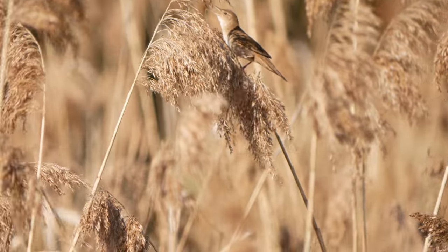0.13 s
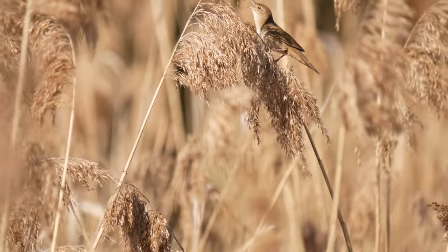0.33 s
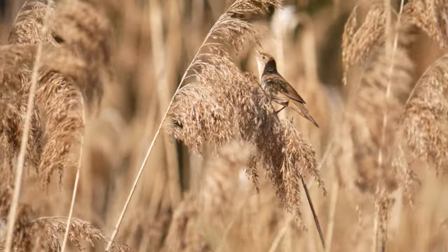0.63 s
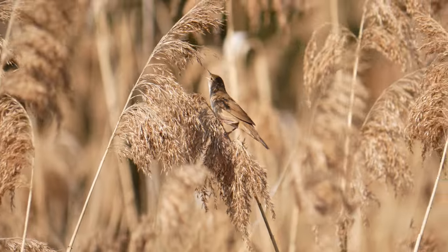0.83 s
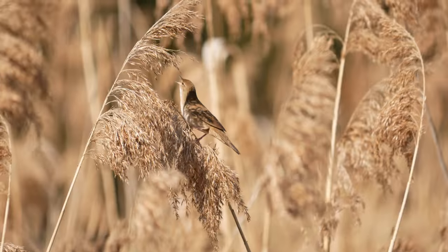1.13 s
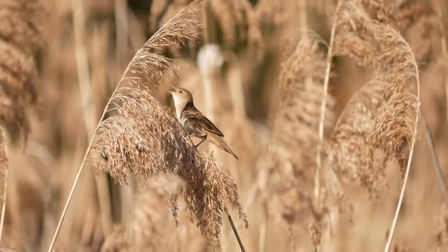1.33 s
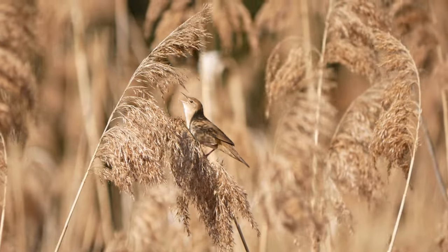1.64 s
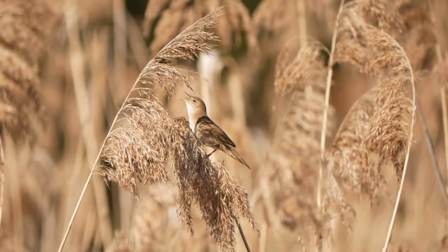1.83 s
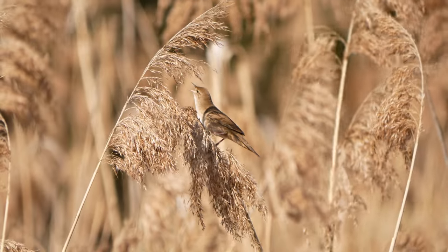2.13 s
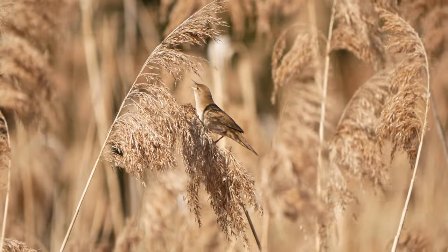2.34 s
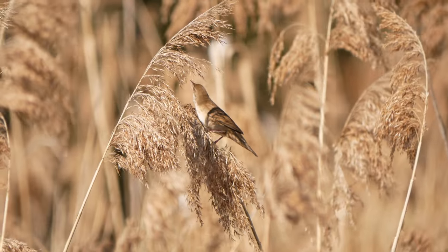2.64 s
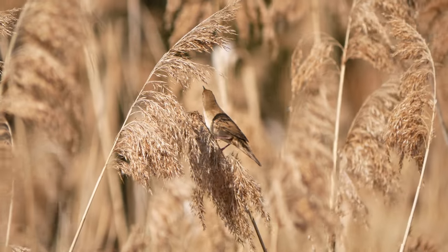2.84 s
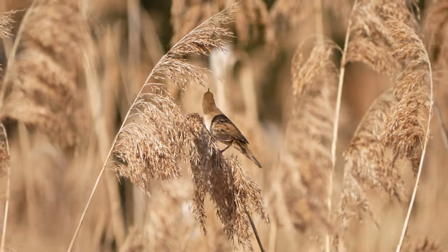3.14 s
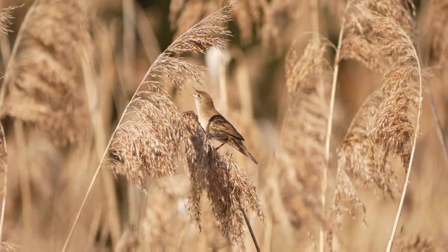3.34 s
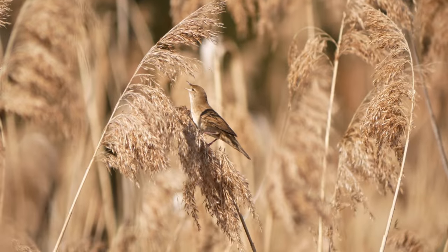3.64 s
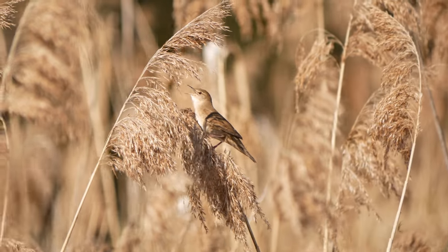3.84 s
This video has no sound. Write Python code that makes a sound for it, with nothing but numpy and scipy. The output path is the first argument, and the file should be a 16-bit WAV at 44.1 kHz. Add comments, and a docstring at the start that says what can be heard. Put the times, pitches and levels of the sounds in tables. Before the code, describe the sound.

A small bird's fast, buzzing trill runs on over faint distant birds and gusts of wind.

```python
"""A warbler in a reed bed. After a quarter second of silence a soft rustling floor cuts in, with a low, hoarse
call in the distance. At once the warbler reels: about 49 short syllables a second near 4 kHz, scattered by the
stems, right to the end. Other birds whistle farther off, one repeats a chip through the first second, and wind
buffets the microphone on and off. More hoarse calls come around 1 s and 3 s, then one short, faint burst near
3.6 s."""
import sys
import numpy as np
from scipy import signal
from scipy.io import wavfile

SR = 44100
rng = np.random.default_rng(int(sys.argv[2]) if len(sys.argv) > 2 else 0)


def master_out(mix):
    """Clip the mix to full scale and print it as 16-bit PCM to the path in sys.argv[1]."""
    frames = np.transpose(np.atleast_2d(mix))
    ceiling = np.clip(frames, -1, 1)
    pcm = np.round(ceiling * 32767).astype(np.int16)
    wavfile.write(sys.argv[1], SR, pcm)


N = 176400


def amp(db):
    return 10 ** (np.asarray(db, float) / 20)


def rms_one(x):
    return x / np.sqrt(np.mean(x ** 2) + 1e-20)


def at_hz(points, hz):
    """Read a curve of (Hz, value) points along a log-frequency axis."""
    freqs, values = np.transpose(points)
    return np.interp(np.log(hz), np.log(freqs), values)


def butter(x, hz, kind, order=2):
    return signal.sosfilt(signal.butter(order, hz, kind, fs=SR, output="sos"), x)


def drift(rate_hz):
    """Smooth random modulation with an rms of 1."""
    pole = np.exp(-80 * np.pi * rate_hz / SR)   # one step per 40 samples
    slow = signal.lfilter([1], [1, -2 * pole, pole * pole], rng.standard_normal(N // 40 + 2002))[2000:]
    return np.interp(np.arange(N) / 40, np.arange(len(slow)), rms_one(slow))


def stereo(mid, side, alike):
    """Spread two noises to left and right; alike runs from 0 (wide) to 1 (mono)."""
    return np.sqrt(1 + alike) * mid + np.sqrt(1 - alike) * side * [[1], [-1]]


def add(out, s, sound, pan_db=0):
    """Mix a sound in at time s, left louder by pan_db."""
    i = int(s * SR)
    piece = sound[max(-i, 0):N - i]
    out[:, max(i, 0):max(i, 0) + len(piece)] += piece * amp([[pan_db / 2], [-pan_db / 2]])


def rustling_floor():
    """Rustle and distant noise: third-octave bands, each with its own level, flicker and width."""
    # tone of the bed: (frequency [Hz], relative level per Hz [dB])
    spectrum = [(40, -25.5), (110, 2), (230, -10.5), (950, -14), (1400, -21), (2300, -24), (3200, -18.5),
                (4800, -24.5), (6400, -37.5), (7500, -47.5), (10500, -43), (12500, -58), (15000, -82)]
    # stereo image of the bed: (frequency [Hz], left-right likeness [0..1])
    likeness = [(100, 0.92), (400, 0.11), (3500, 0.41), (6000, 0.98)]
    level_db, flicker_db = -47.5, 2.5
    edges = 35 * 2 ** np.arange(0, 8.9, 1 / 3)
    shared_swell = drift(2)
    white = rng.standard_normal((2, 2, N))
    out = np.zeros((2, N))
    for k, (low, high) in enumerate(zip(edges, edges[1:])):
        mid, side = butter(white[k % 2], [low, high], "band")
        hz = np.sqrt(low * high)
        gain = amp(at_hz(spectrum, hz) + flicker_db * (0.32 * shared_swell + drift(14)))
        out += gain * stereo(mid, side, at_hz(likeness, hz))
    return amp(level_db) * rms_one(out)


def hoarse_calls_and_burst():
    """Far hoarse calls, and one short, faint burst near 3.6 s: each a swell of noise in one resonance."""
    # four calls, then the short burst: (start [s], length [s], centre [Hz], bandwidth [Hz], level [dB])
    bursts = [(0.12, 0.44, 1085, 180, -52.5), (0.897, 0.39, 915, 33, -54), (0.75, .65, 1460, 300, -58),
              (3.01, 0.5, 1095, 170, -56), (3.575, 0.028, 1300, 710, -53)]
    out = np.zeros((2, N))
    for s, length, hz, width_hz, db in bursts:
        swell = np.sin(np.pi * np.clip((np.arange(N) / SR - s) / length, 0, 1))
        band = [hz - width_hz / 2, hz + width_hz / 2]
        mid, side = rms_one(butter(rng.standard_normal((2, N)), band, "band"))
        out += amp(db) * swell * (mid + 0.6 * side * [[1], [-1]])
    return out


def note_envelope(ms, rise, fall):
    """A bell curve peaking at 0 ms, with separate attack and release widths."""
    return np.exp(-.5 * (ms / np.where(ms < 0, rise, fall)) ** 2)


def warbler_reel():
    """Three-note syllables: the outer notes snap upward in pitch, flashing an overtone as they rise."""
    # pace of the reel: (syllable [number], time [s])
    tempo = [(0, .2538), (18, .6213), (56, 1.3977), (84, 1.9710), (100, 2.2980), (118, 2.6674),
             (142, 3.1591), (163, 3.5904), (183, 4.0015)]
    # fader ride on the reel: (time [s], level [dB])
    loudness = [(.25, -30), (1.07, -30), (1.19, -34.5), (1.4, -28), (1.68, -30.5), (2.3, -29),
                (2.67, -34.5), (3.16, -30), (3.59, -33.5), (4, -30)]
    # notes of a syllable: (peak offset [ms], rise [ms], fall [ms], start pitch [Hz], end pitch [Hz],
    # glide lead [ms], glide time [ms], level [dB], overtone level [dB], overtone lead [ms])
    notes = [(-7.7, .7, .55, 2200, 4500, 1.5, .55, -4, -15, 1.42),
             (-5.8, .6, .9, 4300, 4300, 1, 1, -14, -40, 0), (0, .9, 1.1, 2900, 4110, 2.1, .35, 0, -39, .3)]
    # early reflections off near stems: (delay [ms], level [dB])
    echoes = [(3.6, -18), ]
    jitter_ms, jitter_db, jitter_pitch = .18, 1.1, .007
    out = np.zeros((2, N))
    ms = np.arange(-5, 6, 1000 / SR)   # time around a note's peak
    beats = np.interp(np.arange(184), *np.transpose(tempo))
    for s in beats:
        detune, phase_shift, accent = rng.standard_normal((3, 3))
        late_ms = jitter_ms * rng.standard_normal()
        fader_db = np.interp(s, *np.transpose(loudness))
        for k, (at, rise, fall, low_hz, top_hz, lead, glide, db, over_db, over_lead) in enumerate(notes):
            hz = top_hz - (top_hz - low_hz) * np.exp(-np.maximum(ms + lead, 0) / glide)
            phase = 2 * np.pi * np.cumsum(hz) / SR * (1 + jitter_pitch * detune[k]) + 9 * phase_shift[k]
            tone = note_envelope(ms, rise, fall) * np.sin(phase)
            overtone = amp(over_db) * note_envelope(2 * (ms + over_lead), rise, fall) * np.sin(2 * phase)
            gain = amp(db + fader_db + jitter_db * accent[k])
            add(out, s + (at + ms[0] + late_ms) / 1000, gain * (tone + overtone), pan_db=-.7)
    early = sum(amp(db) * np.roll(out, int(delay * SR / 1000), axis=1) for delay, db in echoes)
    return out + early + amp(-15.5) * stem_scatter(out, alike=.13)


def stem_scatter(x, alike, t60_s=.14):
    """Thousands of stems return a decaying haze, partly its own in each ear."""
    t = np.arange(SR // 2) / SR
    envelope = amp(-60 * t / t60_s) * np.minimum(t * 200, 1)   # 5 ms attack
    mid, side = rng.standard_normal((2, len(t))) * envelope
    tails = stereo(mid, side, alike)
    return signal.fftconvolve(x, tails / np.sqrt(np.sum(tails ** 2) / 2), axes=1)[:, :N]


def whistle(ms, start_hz, end_hz):
    """A sine that glides and levels off under a soft envelope; longer and higher calls are quieter."""
    progress = np.linspace(0, 1, int(ms * SR / 1000))
    hz = start_hz * (end_hz / start_hz) ** (1 - (1 - progress) ** 1.2)
    level_db = -46 - 1.3 * np.log2(ms) - 2.5 * np.log2(start_hz / 4000)
    envelope = np.sqrt(np.sin(np.pi * progress) + 1e-9)
    return amp(level_db) * envelope * np.sin(2 * np.pi * np.cumsum(hz) / SR)


def other_birds():
    """Single whistles from all sides and one repeated chip on the left, washed in the stems' haze."""
    # far whistles: (time [s], length [ms], start pitch [Hz], end pitch [Hz])
    whistles = [(.265, 18, 4900, 6200), (.338, 14, 4900, 6000), (.358, 32, 6800, 4500),
                (.645, 62, 5850, 5550), (.698, 64, 5600, 4750), (.768, 138, 7500, 5800),
                (.905, 55, 5500, 4900), (1.07, 24, 3600, 2200), (1.125, 24, 3400, 2000),
                (1.132, 30, 6800, 4400), (1.15, 95, 2800, 2900), (1.263, 18, 2700, 3200),
                (1.293, 22, 2750, 2050), (1.465, 22, 2250, 2050), (1.533, 24, 7000, 5400),
                (1.585, 45, 3550, 3350), (1.735, 27, 3600, 2500), (1.914, 23, 7000, 4800),
                (1.94, 35, 4900, 5900), (2.355, 65, 2750, 3550), (2.475, 95, 4600, 5000),
                (2.863, 31, 3300, 2300), (3.085, 45, 4800, 4950), (3.232, 62, 7700, 4800),
                (3.415, 45, 2750, 2350), (3.419, 17, 6700, 4800), (3.435, 60, 4750, 5000),
                (3.805, 45, 7000, 3700)]
    # a neighbour's chips: (time [s])
    chips = [.29, .357, .5, .652, .81, .972]
    out = np.zeros((2, N))
    for s, *call in whistles:
        add(out, s, whistle(*call), pan_db=3 * rng.standard_normal())
    for s in chips:
        add(out, s, whistle(ms=20, start_hz=3200, end_hz=2650), pan_db=6)
    out *= amp(2.2 * drift(28))   # the level flutters
    return out + amp(-1) * stem_scatter(out, alike=0)


def wind():
    """Blows of a few wobbling pressure swings over lumpy rumble; the right port is sheltered, duller."""
    # blows on the microphone: (time [s], level [dB], pitch [Hz])
    buffets = [(0.992, -18, 214), (1.093, -20, 167), (1.168, -14.5, 152), (1.2, -16, 208),
               (1.258, -19.5, 157), (1.354, -20, 154), (1.55, -21, 148), (1.669, -22.5, 214),
               (2.22, -23, 208), (2.414, -18, 144), (2.594, -14.5, 202), (2.615, -15, 255),
               (2.664, -17.5, 159), (2.96, -20, 191), (3.185, -21, 218), (3.354, -17.5, 159),
               (3.971, -15, 175)]
    # gusts: (start [s], end [s], level [dB], top of the rumble [Hz])
    gusts = [(0.266, 0.326, -28.5, 234), (0.359, 0.428, -30, 197), (0.811, 0.87, -39, 170),
             (0.913, 1.73, -34, 223), (1.965, 2.028, -29.5, 157), (2.043, 2.31, -36.5, 247),
             (2.335, 2.492, -41.5, 190), (2.517, 2.718, -27.5, 236), (2.867, 3.011, -35, 231),
             (3.062, 3.454, -33, 223), (3.457, 3.757, -32, 157.4), (3.868, 4.033, -32.5, 160)]
    decay_s, wobble_octaves = .007, .17
    lump_db, gust_fade_s = 5, .051
    t = np.arange(N) / SR
    wobbly_time = np.cumsum(2 ** (wobble_octaves * drift(77))) / SR
    blows = np.zeros(N)
    for s, db, hz in buffets:
        near = slice(int((s - .1) * SR), int((s + .1) * SR))
        age = t[near] - s
        envelope = np.exp(-np.abs(age) / decay_s * np.where(age < 0, 2, 1))   # attack twice as fast
        swing = np.cos(2 * np.pi * hz * (wobbly_time[near] - wobbly_time[int(s * SR)]))
        blows[near] += amp(db) * envelope * swing
    turbulence = butter(rng.standard_normal((3, N)), 82, "high", order=3) * amp(lump_db * drift(23.2))
    rumble = np.zeros((3, N))   # shared, left port's own, right port's own
    for start, end, db, top_hz in gusts:
        fade = np.clip(np.minimum(t - start, end - t) / gust_fade_s, 0, 1)
        rumble += amp(db) * fade * rms_one(butter(turbulence, top_hz, "low", order=4))
    exposed = butter(blows + rumble[0], 70, "high", order=3)
    sheltered = butter(exposed, 345, "low", order=1)
    return np.array([exposed, sheltered]) + amp(-11) * rumble[1:]


def scene():
    return warbler_reel() + other_birds() + hoarse_calls_and_burst() + wind() + rustling_floor()


def record(dry, start_s=.2505, stopband_hz=15400):
    """The sound cuts in after a short silence; a steep low-pass takes off the very top."""
    gate = np.clip((np.arange(N) / SR - start_s) * 500, 0, 1)   # opens in 2 ms
    return signal.sosfilt(signal.cheby2(12, 70, stopband_hz, fs=SR, output="sos"), dry * gate)


dry = scene()
out = record(dry)
master_out(out)
```